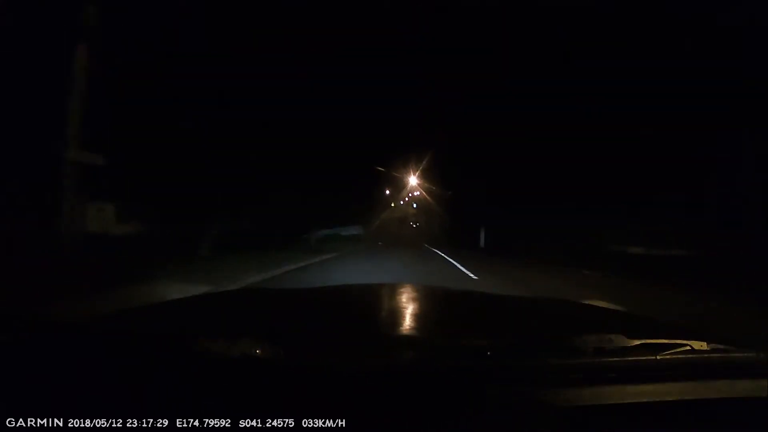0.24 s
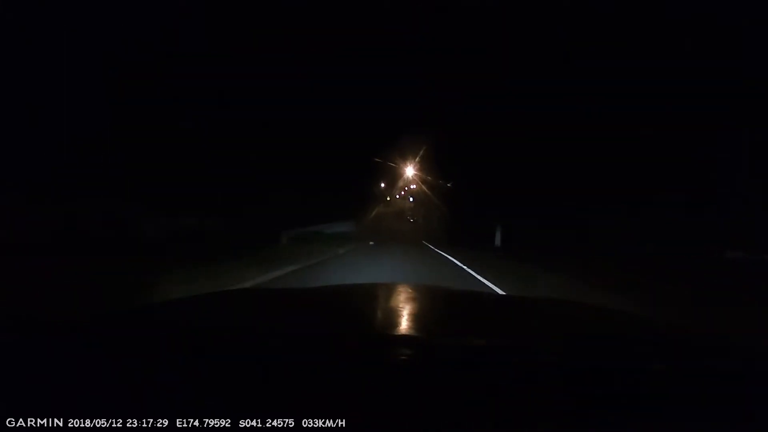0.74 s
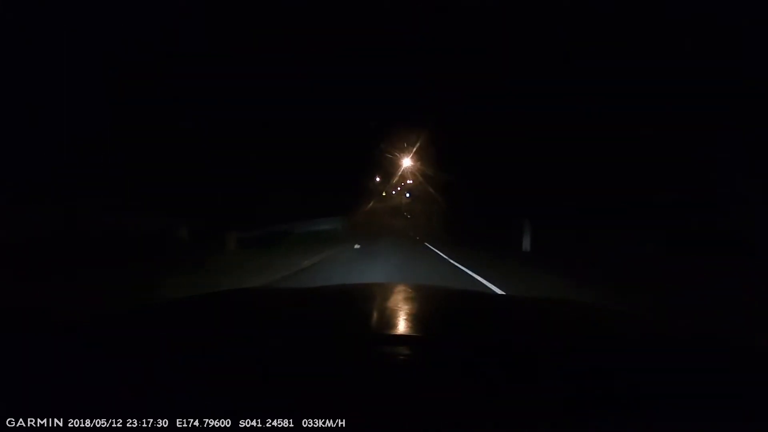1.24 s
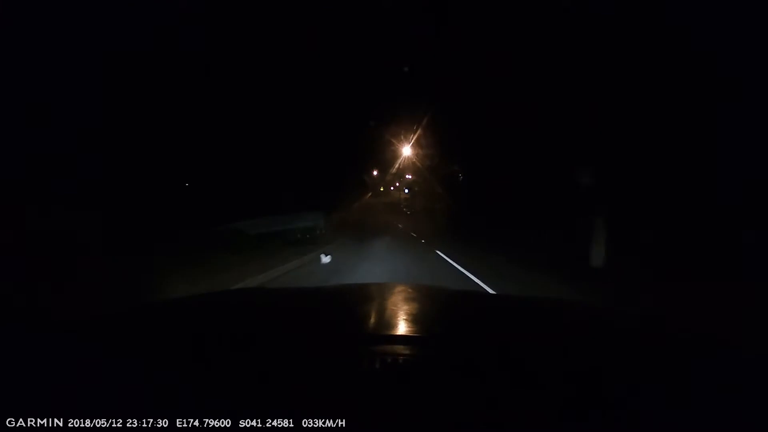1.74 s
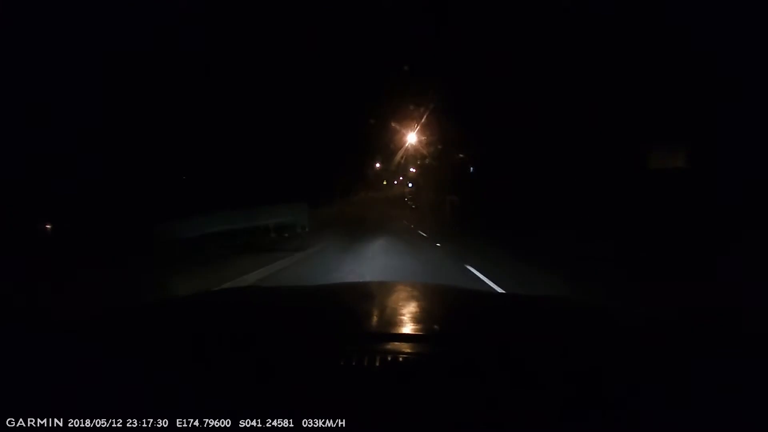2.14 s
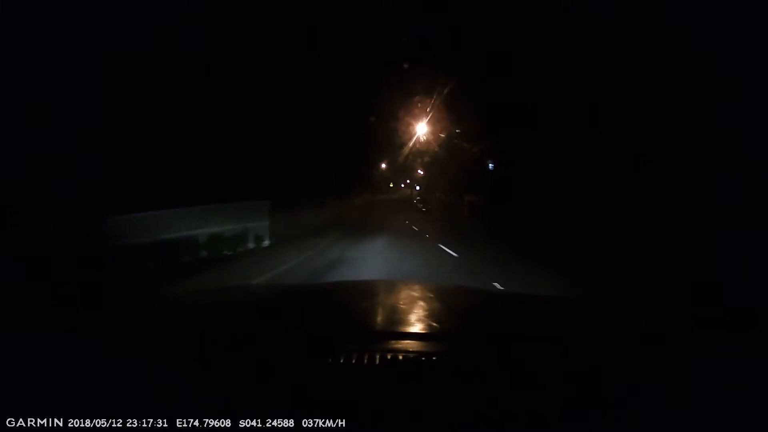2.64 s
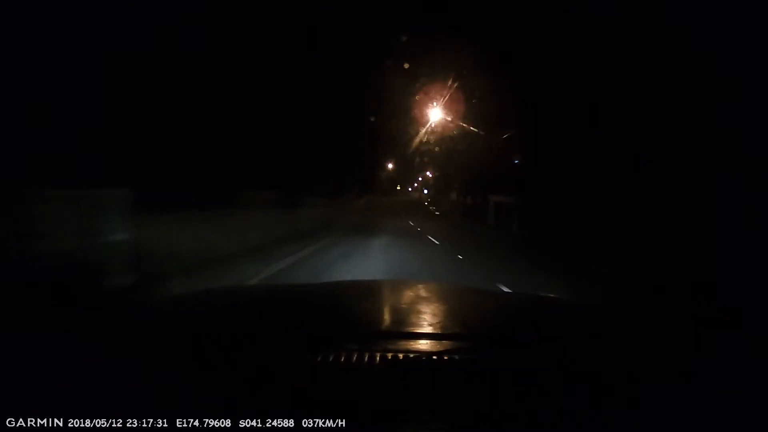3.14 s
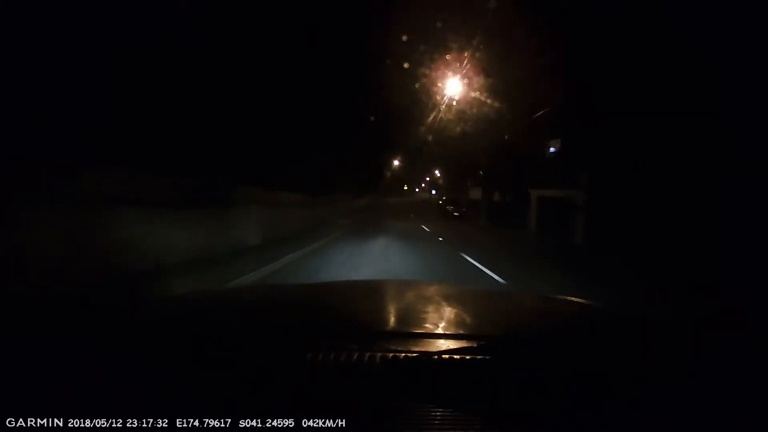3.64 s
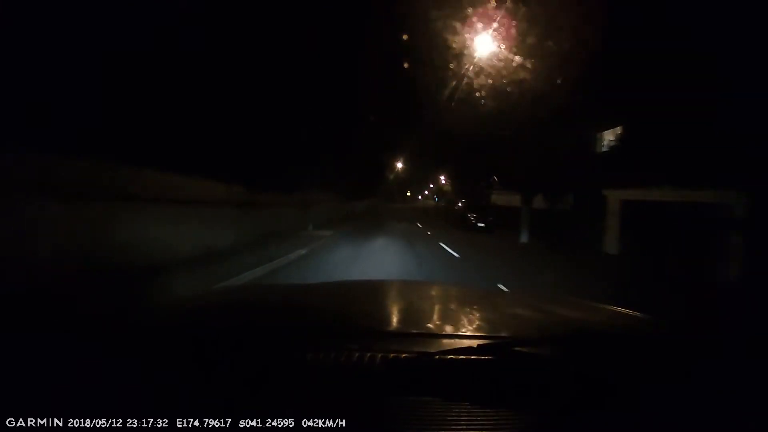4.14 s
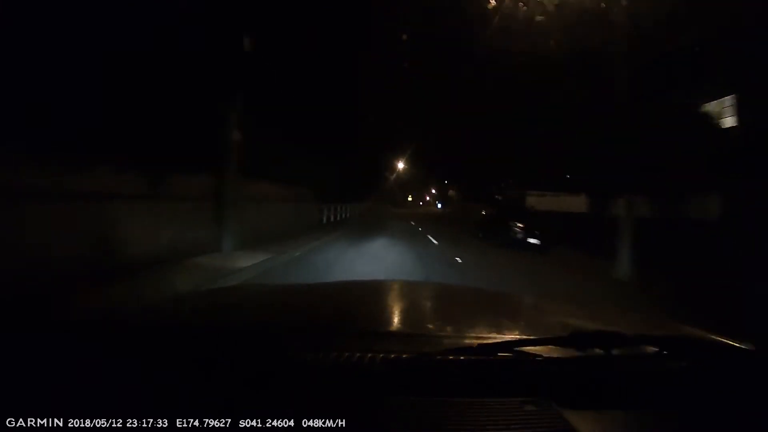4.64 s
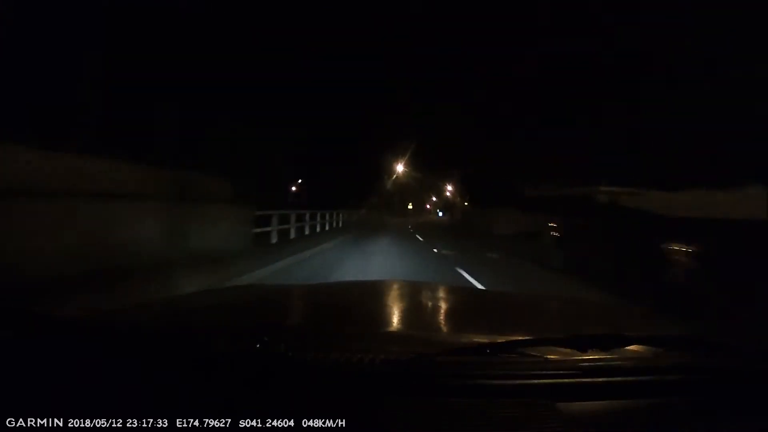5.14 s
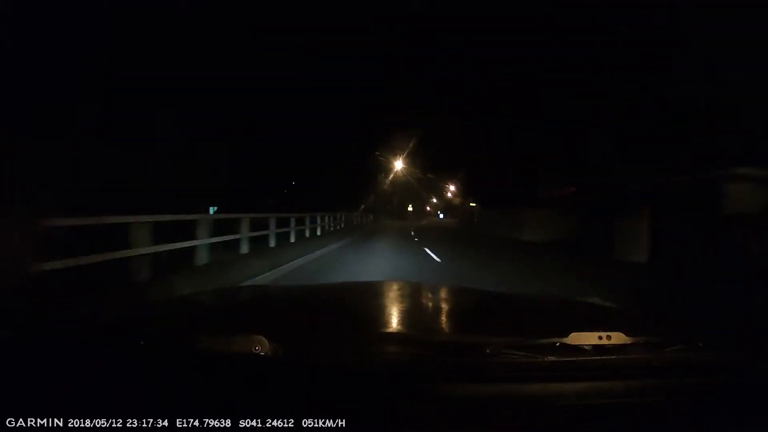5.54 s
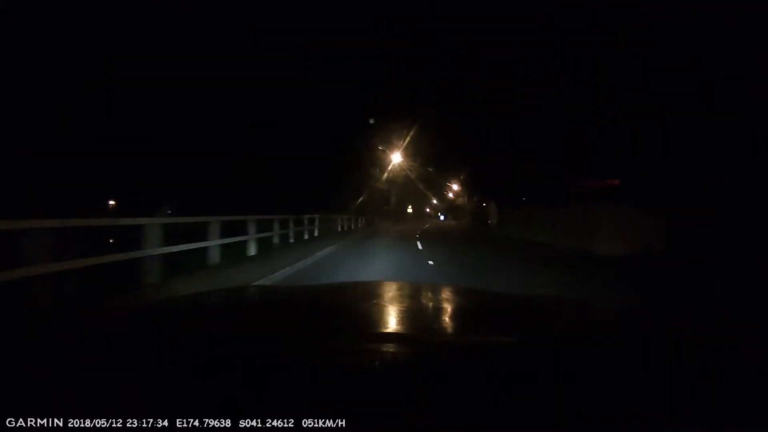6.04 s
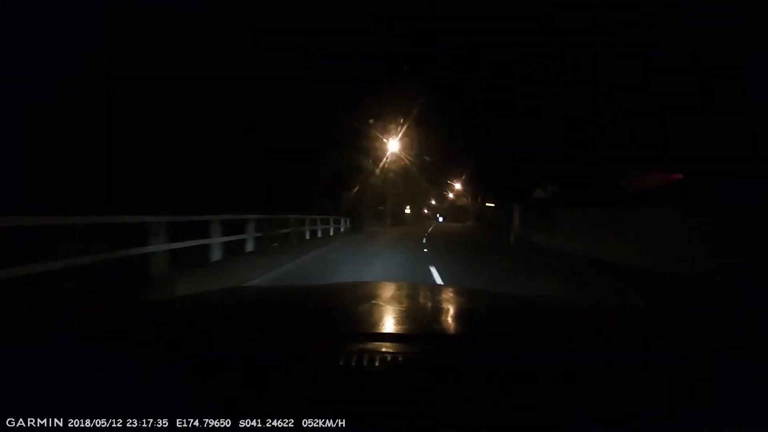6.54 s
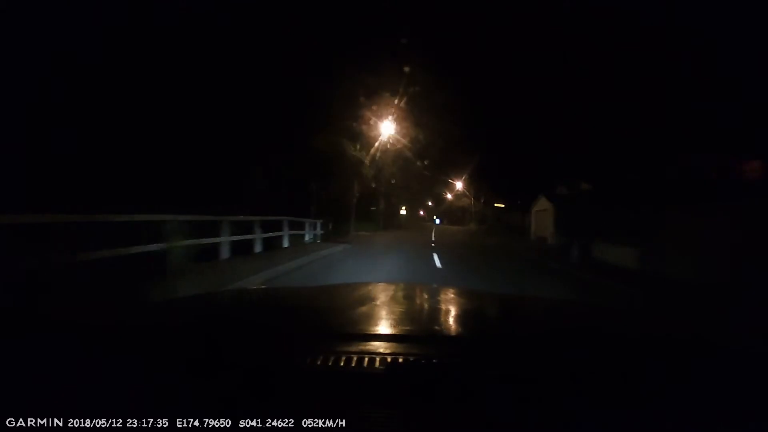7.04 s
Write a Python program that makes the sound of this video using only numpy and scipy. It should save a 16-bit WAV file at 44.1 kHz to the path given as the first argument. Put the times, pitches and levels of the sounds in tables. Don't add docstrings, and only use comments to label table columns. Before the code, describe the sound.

Car cabin rumble: heavy bassy bumps, engine note climbing then dropping after a gear change, faint ticks and clicks, growing tyre rush.

```python
import sys
import numpy as np
from scipy import signal
from scipy.fft import rfft, irfft, next_fast_len
from scipy.io import wavfile
from scipy.ndimage import uniform_filter1d

SR = 44100
rng = np.random.default_rng(int(sys.argv[2]) if len(sys.argv) > 2 else 0)


def unload_audio(sound):
    columns = np.transpose(np.atleast_2d(sound))
    steps = np.round(np.clip(columns, -1, 1) * 32767)
    wavfile.write(sys.argv[1], SR, steps.astype(np.int16))


def attenuation_scalar(level_db):
    decades = np.asarray(level_db, float) / 20
    return 10 ** decades


N = 321489
TIME_S = np.arange(N) / SR


def unit(x):
    return x / np.sqrt(np.mean(x ** 2))


def curve(times_s, values):
    return np.interp(TIME_S, times_s, values)


def follow(table):
    return curve(*np.transpose(table))


def noise():
    return rng.standard_normal(N)


def coloured(points):
    hz, db = np.transpose(points)
    size = next_fast_len(N)
    log_hz = np.log(np.arange(1, size // 2 + 2) * SR / size)
    gain = attenuation_scalar(np.interp(log_hz, np.log(hz), db, left=-200, right=-200))
    return unit(irfft(rfft(rng.standard_normal(size)) * gain, size)[:N])


def walk(rate):
    hold = int(SR / rate)
    steps = np.repeat(rng.standard_normal(N // hold + 1), hold)
    return unit(uniform_filter1d(uniform_filter1d(steps, hold), hold)[:N])


def ring(x, hz, width_hz):
    return signal.lfilter(*signal.iirpeak(hz, hz / width_hz, fs=SR), x)


def steep_ring(x, hz, width_hz):
    return ring(ring(x, hz, width_hz), hz, width_hz)


def body(x, modes):
    return sum(attenuation_scalar(db) * ring(x, hz, width_hz) for hz, width_hz, db in modes)


def puff(db, fade_s):
    t = np.arange(SR * 2 // 25) / SR
    blow = 0.5 * np.sqrt(fade_s * SR) * (t == 0)
    return attenuation_scalar(db) * (blow + np.exp(-t / fade_s) * rng.standard_normal(len(t)))


def knock(db, hz, width_hz, fade_s):
    sound = steep_ring(puff(0, fade_s), hz, width_hz)
    return attenuation_scalar(db) * sound / np.abs(sound).max()


def add(out, s, sound):
    i = int(s * SR)
    out[i:i + len(sound)] += sound


# [t/s of fullest swing, level/dB, f/Hz, length/s]
BUMPS = [(0.0, -18.5, 42.3, 0.02), (0.078, -19.5, 40.7, 0.052), (0.302, -18.5, 41.46, 0.019),
         (0.51, -15.5, 41.66, 0.033), (0.681, -10.5, 45.4, 0.029), (0.84, -15, 44.4, 0.034),
         (0.97, -15, 43.2, 0.099), (1.674, -14.5, 50.63, 0.04), (1.774, -19, 43.8, 0.031),
         (1.863, -17, 47.06, 0.022), (1.978, -13, 46.04, 0.03), (2.092, -3.5, 45.9, 0.034),
         (2.197, -12.5, 43.7, 0.042), (2.288, -10, 38.68, 0.079), (2.519, -13, 45.1, 0.078),
         (2.748, -13, 47.93, 0.12), (2.967, -16, 42.23, 0.05), (3.28, -8.5, 42.64, 0.05),
         (3.616, -13.5, 48.83, 0.05), (3.802, -7.5, 47, 0.056), (3.964, -6.5, 43.55, 0.04),
         (4.208, -8.5, 46.6, 0.066), (4.514, -11.5, 47.9, 0.039), (4.672, -11.5, 46.25, 0.068),
         (5.074, -9, 44.6, 0.064), (5.233, -9.5, 51.15, 0.028), (5.646, -13.5, 48.4, 0.053),
         (6.203, -17.5, 45.2, 0.048), (6.738, -12.5, 45, 0.075), (7.165, -10, 43.2, 0.062),
         (0.757, -21, 40.4, 0.032), (1.25, -23, 41.6, 0.027), (1.436, -20, 44.1, 0.021),
          (2.389, -10.5, 38, 0.013), (3.116, -17, 44.7, 0.024), (3.194, -16, 38.12, 0.019),
          (3.438, -22, 40.97, 0.027), (3.682, -24, 49.4, 0.019), (3.877, -9.5, 44.4, 0.031),
          (4.093, -9.5, 41.84, 0.028), (4.303, -14.5, 46.34, 0.022), (4.76, -11, 47.55, 0.019),
          (4.886, -14, 47.17, 0.035), (5.433, -16.5, 45.97, 0.022), (5.557, -18, 44, 0.027),
          (5.828, -28, 45.9, 0.042), (5.916, -23, 43.45, 0.029), (6.039, -21, 44.1, 0.023),
          (6.309, -13.5, 43.08, 0.02), (6.528, -23, 42.44, 0.023), (6.658, -9, 45.05, 0.079),
          (6.819, -7.5, 43.3, 0.046), (6.923, -16.5, 42.95, 0.016), (7.043, -10.5, 45.1, 0.02)]
ALL_BUMPS = sorted(BUMPS)


def bump_power(s, db, length_s):
    reach_s = length_s * np.where(TIME_S < s, 0.84, 0.89)
    return attenuation_scalar(db) ** 2 * np.exp(-((TIME_S - s) / reach_s) ** 2 * 2)


def bumps():
    return np.sqrt(sum(bump_power(s, db, length_s) for s, db, hz, length_s in ALL_BUMPS))


def rocking():
    out, sign, last_s, last_length_s = np.zeros(N), 1, 0, 0
    for s, db, hz, length_s in ALL_BUMPS:
        if s - last_s > 0.85 * (length_s + last_length_s):
            sign = -sign
        out += sign * bump_power(s, db, length_s)
        last_s, last_length_s = s, length_s
    return np.sign(out) * np.sqrt(np.abs(out))


# [t/s, level/dB]
SHAKING = [(0.0, -41.5), (0.65, -29), (0.69, -27), (0.93, -30), (1.95, -28), (2.05, -19.5), (2.11, -25),
           (3.25, -25), (3.27, -20.5), (5.66, -27.5), (6.19, -19), (6.23, -27.5), (6.58, -19.5),
           (6.68, -35), (6.86, -18.5), (7.29, -27.5)]


def shaken(level_db, share, rev_db, flicker_db, rate):
    shaking_db = follow(SHAKING) + 22
    return attenuation_scalar(level_db + share * shaking_db + rev_db * revs() + flicker_db * walk(rate))


# [level/dB, dB per dB of shaking, dB per engine cycle a second, flicker/dB]
LULL = (-21, 0.8, 0.2, 3)


def boom():
    s, db, hz, length_s = np.transpose(ALL_BUMPS)
    phase = 2 * np.pi * np.cumsum(curve(s, hz)) / SR + 0.5 * walk(18)
    upper_shake = ring(ring(noise(), 58.4, 27.0), 56.2, 29.5)
    lower_shake = ring(ring(noise(), 32.4, 14.0), 32.4, 13.3)
    shake = attenuation_scalar(-12) * unit(upper_shake + lower_shake)
    axle = attenuation_scalar(-39.0) * unit(steep_ring(noise(), 27.0, 21))
    lull = shaken(*LULL, 16)
    swing = np.sqrt(2) * (np.sin(phase) * rocking() + np.cos(phase) * lull)
    return swing + shake * np.hypot(bumps(), lull) + axle


# [t/s, level/dB, f/Hz, length/s]
THUDS = [(0.75, -17.5, 69.5, 0.039), (1.657, -21, 67.6, 0.038), (2.041, -11.5, 70.5, 0.024),
         (2.082, -21, 125, 0.023), (2.178, -23.5, 126, 0.016), (2.185, -25, 70.8, 0.023),
         (2.286, -23, 125.4, 0.021), (2.358, -14.5, 68.4, 0.032), (2.516, -29, 71.8, 0.013),
         (2.667, -20, 69.0, 0.033), (2.824, -17, 69.24, 0.031), (2.947, -24.5, 136.7, 0.073),
         (3.074, -25.5, 120.4, 0.038), (3.217, -24, 127.3, 0.025), (3.287, -14.5, 71.2, 0.026),
         (3.421, -16, 73.1, 0.029), (3.537, -18, 71.24, 0.036), (3.564, -21.5, 129.7, 0.05),
         (3.669, -30, 71, 0.02), (3.67, -25, 139.4, 0.017), (3.82, -30, 130.6, 0.017),
         (3.841, -16, 78.5, 0.022), (3.932, -19.5, 131.2, 0.043), (4.029, -11, 73, 0.018),
         (4.047, -16, 125.6, 0.021), (4.167, -22, 71, 0.038), (4.201, -21, 122.3, 0.021),
         (4.319, -16, 68.46, 0.02), (4.322, -34, 117, 0.02), (4.508, -23, 123, 0.033),
         (4.66, -35, 66.3, 0.023), (5.027, -22, 68.5, 0.02), (5.06, -28, 122.5, 0.032),
         (5.213, -26, 68.2, 0.065), (5.484, -22.5, 131.4, 0.04), (5.651, -22.5, 123.4, 0.022),
         (6.065, -22, 75.15, 0.03), (6.091, -25, 123, 0.025), (6.196, -26, 121.6, 0.023),
         (6.383, -22.6, 67.1, 0.019), (6.484, -15, 67.33, 0.014), (6.574, -18, 71.65, 0.032),
         (6.623, -21, 117.3, 0.017), (6.899, -22, 122.3, 0.025), (6.92, -18, 69.7, 0.027),
         (7.021, -21, 116.3, 0.019), (7.03, -18, 68.2, 0.037), (7.175, -19, 69, 0.04),
         (0.279, -31, 191.5, 0.04), (0.732, -35, 246.6, 0.019), (1.038, -29.5, 204, 0.024),
         (1.661, -34, 305.3, 0.03), (1.805, -27, 192, 0.022), (1.826, -32, 239.7, 0.02),
         (2.044, -26.5, 318, 0.017), (2.058, -33, 187.8, 0.042), (2.318, -27, 185.8, 0.021),
         (2.438, -29, 192.0, 0.016), (2.447, -29, 241, 0.02), (2.569, -30, 309, 0.039),
         (2.699, -27, 304.5, 0.018), (2.808, -38, 308.3, 0.011), (2.812, -31, 237, 0.021),
         (2.883, -29, 199, 0.019), (3.184, -28.5, 313, 0.019), (3.265, -27.5, 314, 0.019),
         (3.518, -24.5, 246, 0.024), (3.618, -27, 257, 0.021), (3.826, -29, 315.6, 0.022),
         (3.865, -27, 193, 0.029), (3.919, -28, 245, 0.053), (4.043, -31.5, 293.5, 0.038),
         (4.109, -28, 183.8, 0.022), (4.178, -25, 247.6, 0.02), (4.179, -31, 311.7, 0.018),
         (4.261, -33, 312, 0.026), (4.264, -28, 248.1, 0.014), (4.754, -27.5, 247, 0.021),
         (4.761, -35, 310.4, 0.035), (4.91, -29.5, 298.5, 0.019), (4.939, -28, 193, 0.035),
         (5.176, -32, 299, 0.048), (5.208, -33.5, 247.2, 0.053), (5.271, -37, 186.2, 0.018),
         (5.49, -28, 318, 0.016), (5.623, -27, 323.4, 0.023), (5.714, -29, 244.7, 0.018),
         (5.9, -37, 313, 0.019), (6.078, -24, 302, 0.023), (6.187, -26, 302, 0.018),
         (6.608, -35.5, 249.7, 0.025), (6.816, -31, 314.6, 0.046), (7.057, -34, 307.9, 0.019),
         (7.137, -31, 192.1, 0.018), (7.189, -31.5, 247.3, 0.021), (7.221, -36, 299.4, 0.018),
         (0.821, -26, 130.5, 0.055), (0.982, -29, 71, .04), (1.299, -25, 76, .03), (1.492, -33, 298, 0.027),
         (3.09, -31, 327, 0.026), (3.777, -32.5, 339, .03), (3.999, -28, 261.3, 0.041),
         (4.247, -33, 332.7, 0.034), (4.626, -19, 72.1, 0.038), (5.384, -30.5, 328, 0.037),
         (5.764, -32.5, 328, 0.035), (6.331, -25, 71.55, 0.028), (7.02, -32.5, 330.5, .03),
         (7.15, -34.5, 329.8, .03), (7.251, -37, 286.7, 0.041)]


def thuds():
    out, t = np.zeros(N + SR), np.arange(-SR // 5, SR // 5) / SR
    for s, db, hz, length_s in THUDS:
        bell = np.exp(-(t / (1.09 * length_s)) ** 2)
        swell = bell * np.sin(2 * np.pi * (hz * t + rng.random()))
        add(out, s, np.sqrt(2) * attenuation_scalar(db - 4) * swell)
    return out[SR // 5:][:N]


def resonate(modes):
    out = 0
    for hz, width_hz, db, gentle_db, shifted_db in modes:
        level_db = db + by_state(gentle_db, 0, shifted_db) + 1.23 * walk(9)
        out = out + attenuation_scalar(level_db) * unit(steep_ring(noise(), hz, 1.37 * width_hz))
    return unit(out)


# [f/Hz, width/Hz, level/dB, change pulling gently/dB, change after the shift/dB]
FLOOR_PAN = [(59.3, 13, 5.5, -6.5, -1), (95.5, 21, -9, 4, -2.5), (162, 25, -12, 1, -8.5),
             (72.5, 26.4, 5.5, -2.5, 1), (115.2, 19, -2.5, -1, -3.5), (132.4, 18.6, -0.5, -6.5, 0)]
# [f/Hz, width/Hz, level/dB, change gently/dB, change after shift/dB]
PANELS = [(193.3, 23, -5, 0.5, -3.5), (245.7, 27.4, -6.5, 1, 0.5), (291.9, 30, -5, -1, -0.5),
          (328, 16.7, -7, -4.5, 1.5), (428, 61, -17.5, 1.5, 1), (562, 40, -25.5, 8, -2),
          (860, 98, -25.5, -3, 0.5)]
# [level/dB, dB per dB of shaking, dB per engine cycle a second, flicker/dB]
HEAVE = (-22.5, 0.16, 0.07, 4)
PAN = (-25.5, 0.3, 0.1, 0.1)
PANEL = (-33.5, 0.28, 0, 0.3)


def shell():
    heave = np.sqrt(2) * np.sin(2 * np.pi * 20 * TIME_S + 1.83 * walk(13))
    floor_pan = resonate(FLOOR_PAN) * shaken(*PAN, 8.3)
    panels = resonate(PANELS) * shaken(*PANEL, 9.9)
    return heave * shaken(*HEAVE, 8) + floor_pan + panels


# [t/s, rate/cycles per s]
CYCLE = [(0.0, 13.87), (0.6, 14.65), (1.2, 14.86), (1.8, 15.23), (2.4, 15.89), (3.0, 16.75), (3.5, 16.98),
         (4.0, 17.23), (4.3, 17.19), (4.6, 15.89), (4.9, 14.78), (5.2, 13.51), (5.5, 13.0), (5.9, 12.56),
         (6.5, 12.21), (7.29, 11.92)]


def revs():
    return follow(CYCLE) - 15


# [t/s] pulling gently, top revs from, top revs to, after the shift
STATES_S = (2.0, 2.7, 4.2, 5.0)


def by_state(gentle, top, shifted):
    return curve(STATES_S, (gentle, top, top, shifted))


# [multiple of cycle rate, level gently/dB, level at top revs/dB, level after the shift/dB]
HUM = [(3, -33.5, -28.5, -28), (5.956, -37, -35, -68), (8.984, -36.5, -35, -49),
       (9.99, -45.5, -46.5, -45.5), (13.08, -49, -46, -72), (14.04, -52, -43, -51), (15, -49.5, -44.5, -48),
       (20, -51, -50, -50), (30.12, -56, -51, -52.5)]


def engine_hum(turns):
    hum = 0
    for order, *levels_db in HUM:
        wobble = 0.69 * walk(6) + 2 * np.pi * rng.random()
        gain = attenuation_scalar(by_state(*levels_db) + 2.55 * walk(6))
        hum = hum + np.sqrt(2) * gain * np.sin(2 * np.pi * order * turns + wobble)
    return hum


def strike(times_s, gains):
    out = np.zeros(N)
    np.add.at(out, np.clip((np.asarray(times_s) * SR).astype(int), 0, N - 1), gains)
    return out


def burst(hits, fade_s):
    return signal.lfilter([1], [1, -np.exp(-1 / (fade_s * SR))], hits) * noise()


# [place in cycle 0-1, bright tick level/dB, dull tick level/dB]
VALVES = [(.87, -51.5, -60.5), (.52, -53.5, -59), (0.7, -68, -65), (0.2, -58, -60), (.62, -55, -61.5)]
# [f/Hz, width/Hz, level/dB]
BRIGHT = [(5410, 52, 3.5), (6276, 93, 2), (6650, 73, -1.5), (7230, 130, -1.5), (8000, 200, -6.5),
          (10370, 870, -7)]
DULL = [(1330, 28, 9), (2633, 100, 2.5), (2936, 60, 6), (3610, 36, 6), (4035, 105, 2.5)]


def valve_gear(turns):
    cycles = np.arange(int(turns[-1]))
    bright, dull = np.zeros(N), np.zeros(N)
    for place, bright_db, dull_db in VALVES:
        jitter, force = rng.standard_normal((2, len(cycles)))
        times_s = np.interp(cycles + place + 0.012 * jitter, turns, TIME_S)
        bright += strike(times_s, attenuation_scalar(bright_db + 0.99 * force))
        dull += strike(times_s, attenuation_scalar(dull_db + 1.1 * force))
    effort = (follow(CYCLE) / 15) ** 0.91
    return effort * 4 * (body(burst(bright, 0.0053), BRIGHT) + body(burst(dull, 0.01), DULL))


# [f/Hz, width/Hz, level/dB]
BLOCK = [(1290, 35, -25), (1333, 17, 6.5), (2954, 72, -5.5), (3430, 91, -10.5), (5230, 140, -10),
         (6280, 110, -7), (7160, 130, -8)]
# [level/dB] gently, at top revs, after the shift
BLOCK_DB = (-61, -62.5, -90)
# [t/s, level/dB]
BELT = [
    (3.4, -85),
    (3.65, -59),
    (3.95, -63),
    (4.15, -85),
]


def engine():
    turns = np.cumsum(follow(CYCLE)) / SR
    block = unit(body(noise(), BLOCK)) * attenuation_scalar(by_state(*BLOCK_DB))
    belt = unit(ring(noise(), 3140, 90)) * attenuation_scalar(follow(BELT))
    return engine_hum(turns) + valve_gear(turns) + block + belt


# [t/s, blow level/dB, added ring f/Hz, ring peak level/dB, broad snap against the blow/dB]
CLICKS = [(0.6738, -53, 1500, -43, 9), (0.6755, -60, 2900, -52, 5), (1.3947, -54, 4400, -48, -6),
          (2.0262, -48, 3750, -45, -6), (2.0515, -44, 3400, -43, -8), (2.2644, -49, 3230, -38, -12),
          (2.2668, -46, 3500, -39, -14), (2.2672, -56, 1900, -44, -14), (2.2912, -56, 3088, -50, -14)]
# [f/Hz, width/Hz, level/dB]
TRIM = [(1300, 500, -8), (1880, 450, 6), (3080, 170, 15), (3490, 150, 7), (5400, 400, -2), (6350, 500, -4),
        (7600, 500, -12), (10400, 5500, -17)]
# [t/s, peak level/dB, f/Hz, fade/s]
KNOCKS = [(0.345, -37.5, 594, .006), (2.032, -26.5, 400, 0.026), (6.533, -48, 906, .011),
          (6.58, -45, 1455, .011), (6.868, -35.5, 860, 0.0097), (6.869, -45, 618.6, 0.0087),
          (6.87, -27, 397.7, 0.012), (7.073, -36, 600, .006)]
# [t/s, level/dB]
SPRAY = [
    (1.45, -80),
    (1.57, -60),
    (1.7, -63),
    (1.8, -61),
    (1.95, -80),
]
# [t/s, peak level/dB, f/Hz]
TICKS = [(1.5693, -51, 10400), (1.6294, -54, 10400), (1.6965, -50, 10860), (1.7604, -50, 10500),
         (1.8294, -53, 10900)]


def trim():
    out = unit(steep_ring(noise(), 11000, 3500)) * attenuation_scalar(follow(SPRAY) + 1.1 * walk(40))
    for s, db, hz, ring_db, snap_db in CLICKS:
        hit = puff(db, 0.0054)
        snap = attenuation_scalar(snap_db) * ring(hit, 4500, 11000)
        add(out, s, body(hit, TRIM) + knock(ring_db, hz, 0.2 * hz, 0.0023) + snap)
    for s, db, hz, fade_s in KNOCKS:
        add(out, s, knock(db, hz, 140, fade_s))
    for s, db, hz in TICKS:
        add(out, s, knock(db - 3, hz, 1200, 0.005))
    return out


# [f/Hz, level/dB per Hz]
RUSH = [(210, -35), (370, -2), (500, -7), (804, -11.5), (1180, -21), (1310, -18), (1600, -24.5),
        (2130, -26), (2940, -32), (3270, -33), (6000, -34), (7800, -40.5), (13200, -120)]
# [t/s, speed/km/h]
SPEED = [(0, 25), (2.4, 37), (5.0, 43), (7.29, 49.5)]


def tyre_rush():
    speed = follow(SPEED) - 40
    rush_db = -41.5 + 1.19 * revs() + 0.1749 * speed + 0.5 * bumps()
    return coloured(RUSH) * attenuation_scalar(0.62 * walk(12)) * attenuation_scalar(rush_db)


# [t/s, level/dB]
WIND = [(0, -70), (2, -60), (4.5, -54.5), (7.29, -59.5)]


def wind():
    hush = ring(ring(ring(noise(), 1430, 1300), 1370, 870), 2050, 900)
    return unit(hush) * attenuation_scalar(follow(WIND))


def scene():
    return (boom() + thuds() + shell() + engine() + trim() + tyre_rush() + wind())[None]


# [f/Hz, level/dB per Hz]
HISS = [(300, -4), (2000, 5), (5000, -2), (8000, 0.5), (12000, 0), (16000, -1.5)]


def hiss(db):
    return attenuation_scalar(db) * coloured(HISS)


def roll_off(x):
    return signal.sosfilt(signal.butter(12, 15730, fs=SR, output="sos"), x)


def record(dry):
    overload = 0.69
    x = np.clip(dry + hiss(-56.5), -overload, overload)
    x = signal.sosfilt(signal.butter(1, 1.5, "high", fs=SR, output="sos"), x)
    return roll_off(x + hiss(-60.5))


dry = scene()
out = record(dry)
unload_audio(out)
```